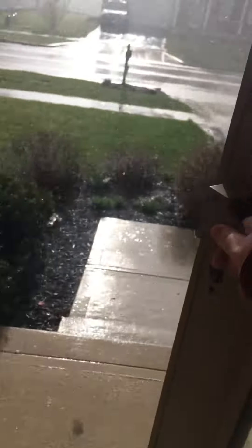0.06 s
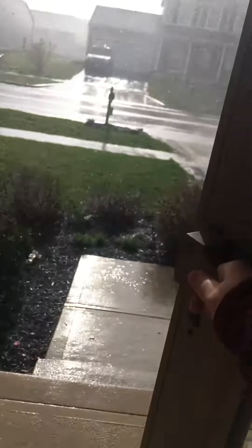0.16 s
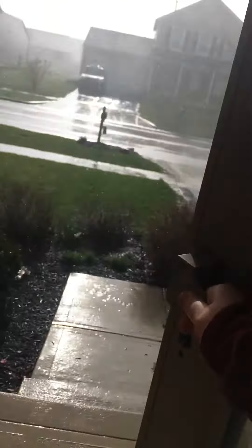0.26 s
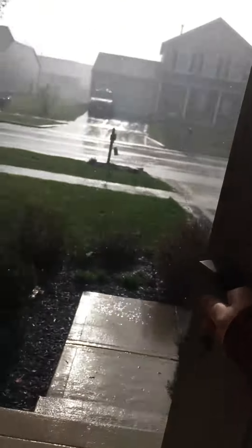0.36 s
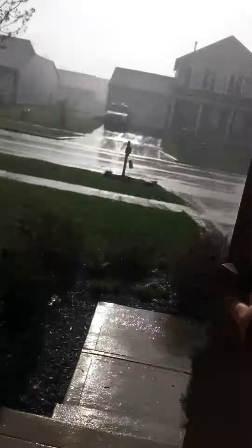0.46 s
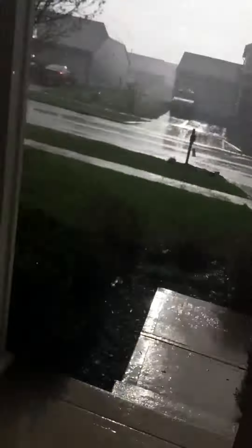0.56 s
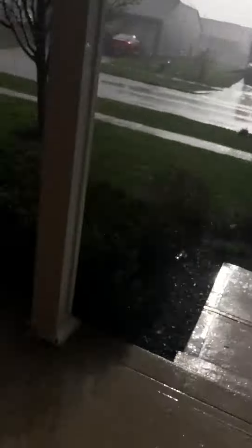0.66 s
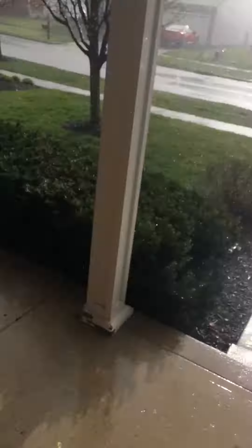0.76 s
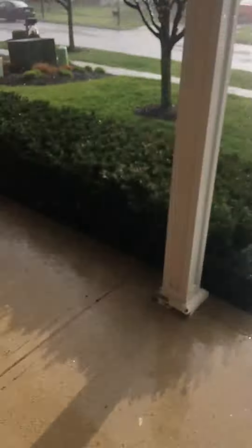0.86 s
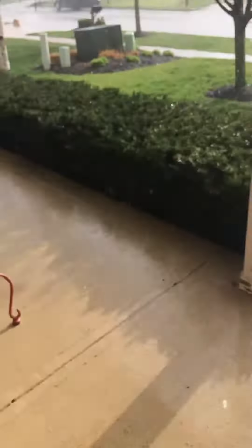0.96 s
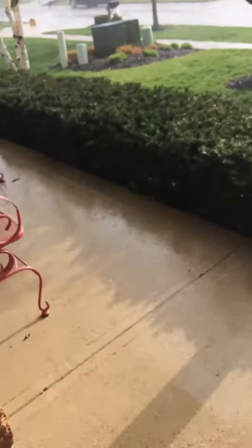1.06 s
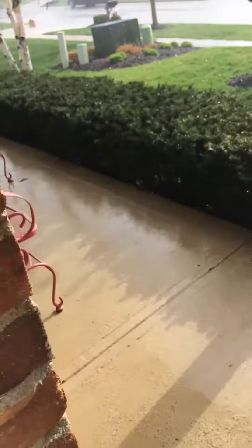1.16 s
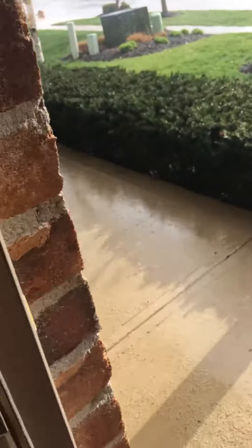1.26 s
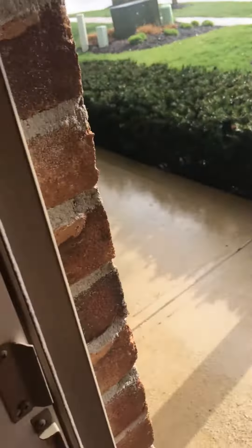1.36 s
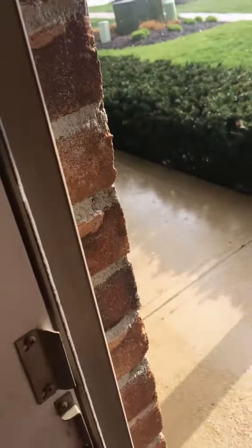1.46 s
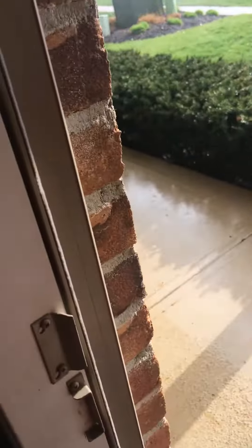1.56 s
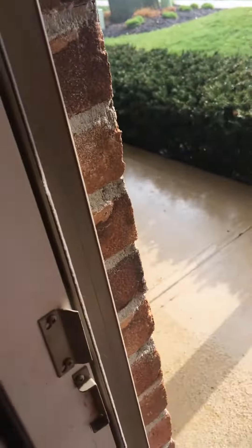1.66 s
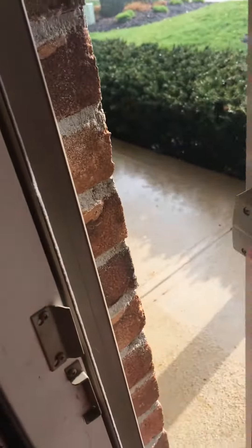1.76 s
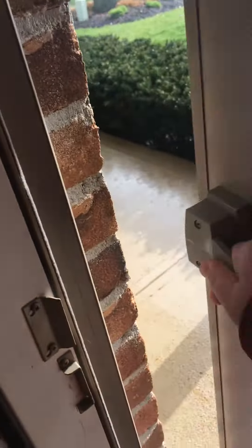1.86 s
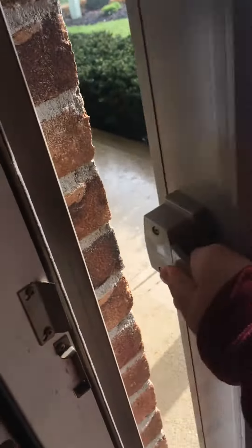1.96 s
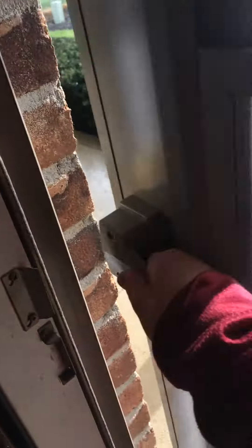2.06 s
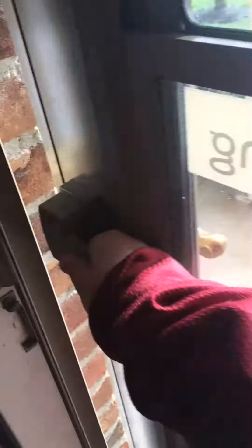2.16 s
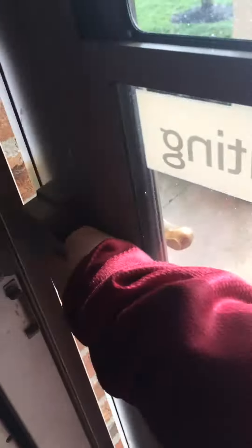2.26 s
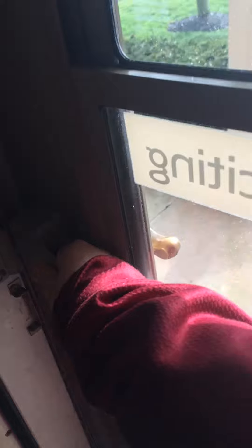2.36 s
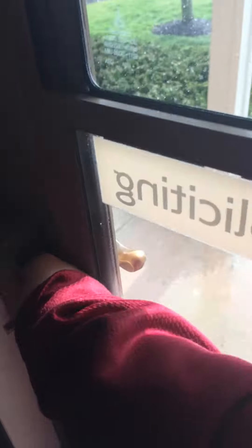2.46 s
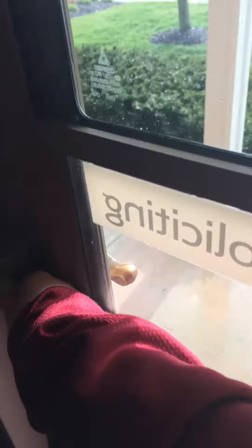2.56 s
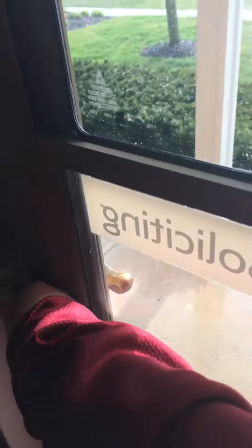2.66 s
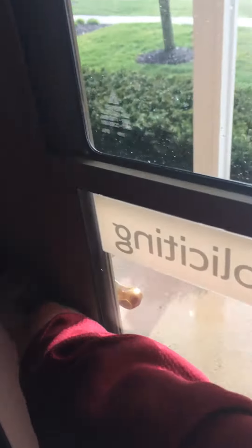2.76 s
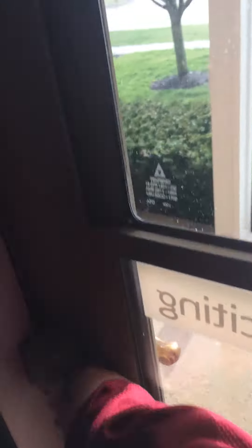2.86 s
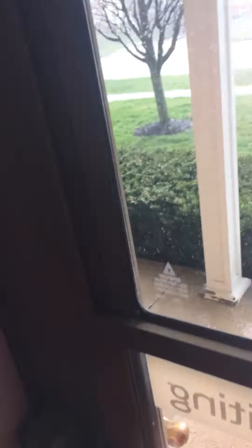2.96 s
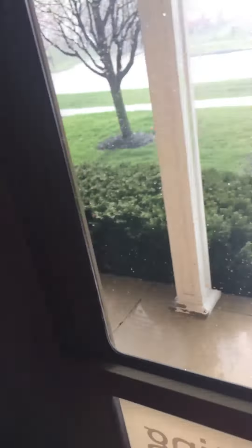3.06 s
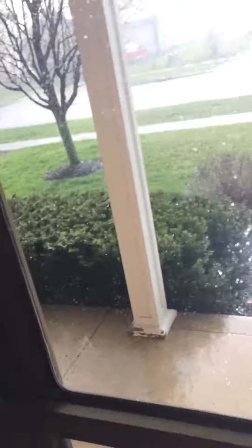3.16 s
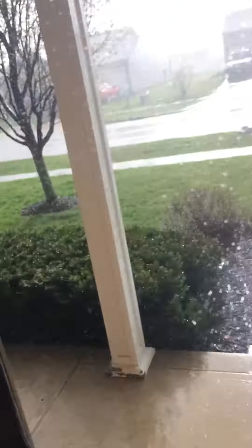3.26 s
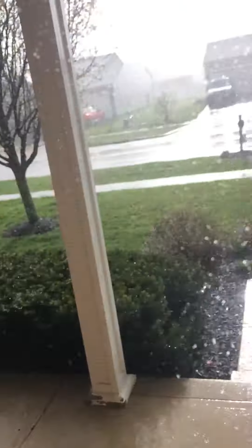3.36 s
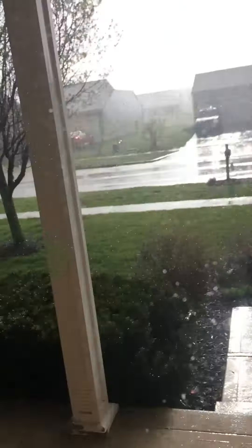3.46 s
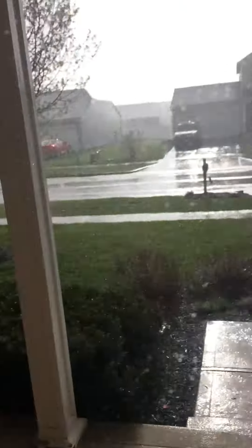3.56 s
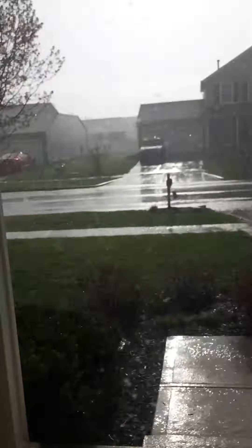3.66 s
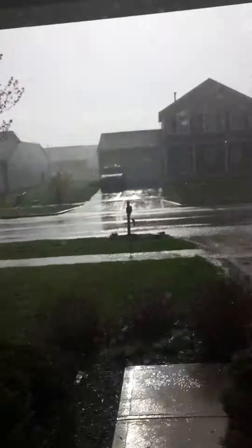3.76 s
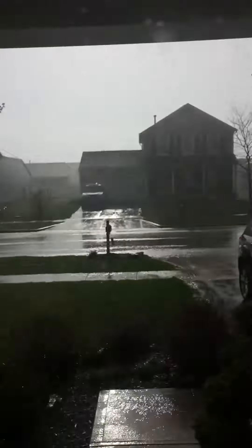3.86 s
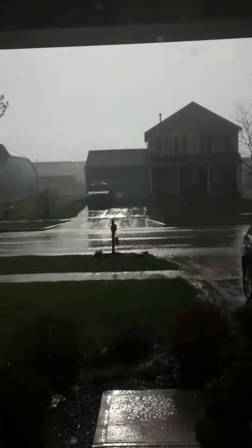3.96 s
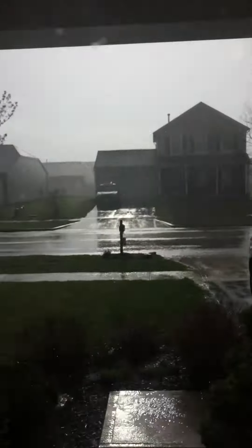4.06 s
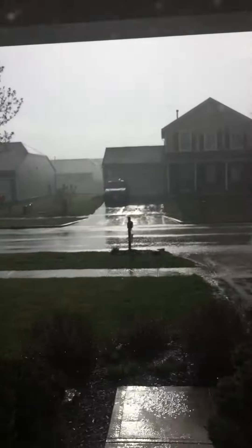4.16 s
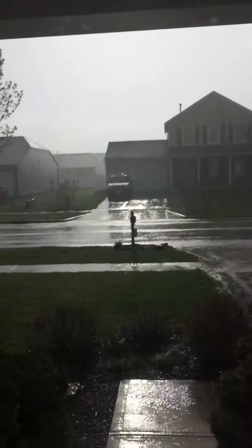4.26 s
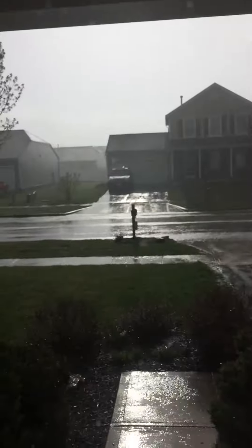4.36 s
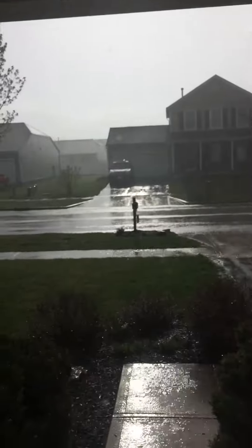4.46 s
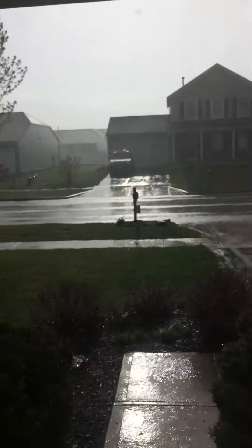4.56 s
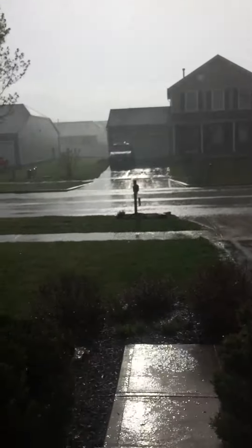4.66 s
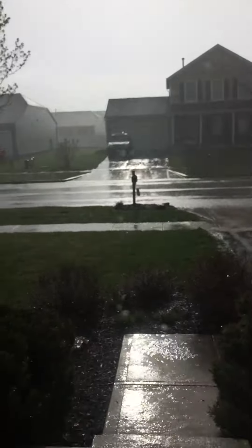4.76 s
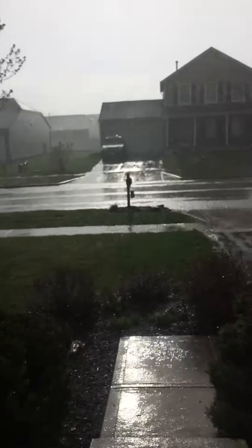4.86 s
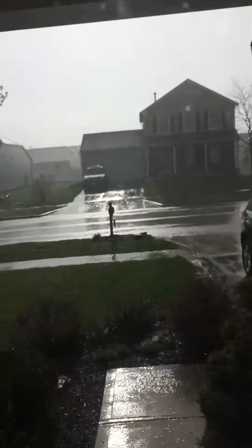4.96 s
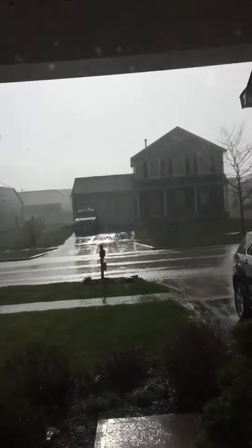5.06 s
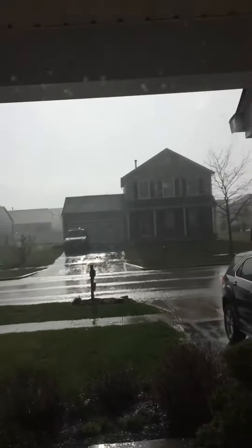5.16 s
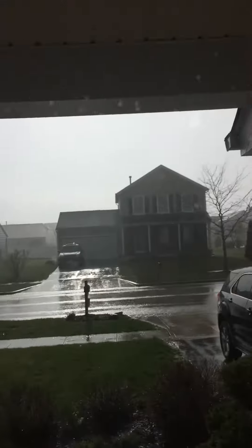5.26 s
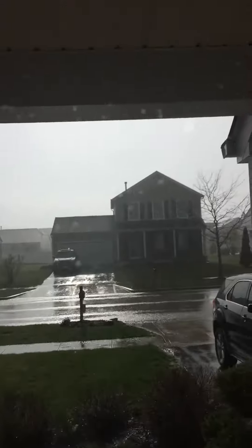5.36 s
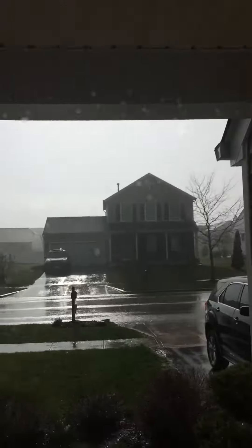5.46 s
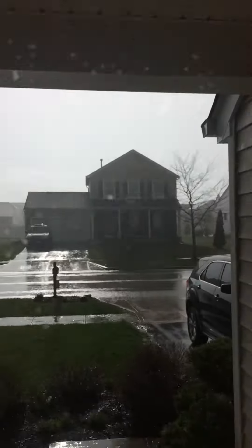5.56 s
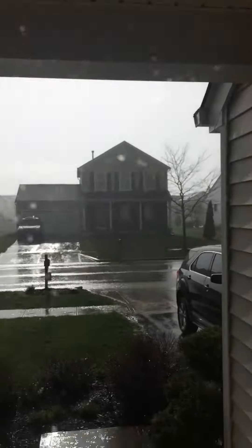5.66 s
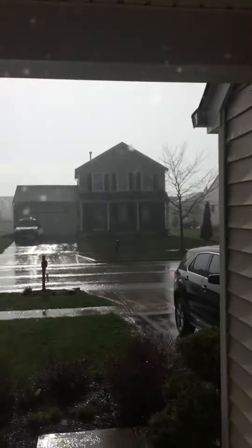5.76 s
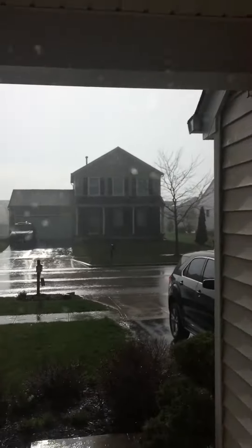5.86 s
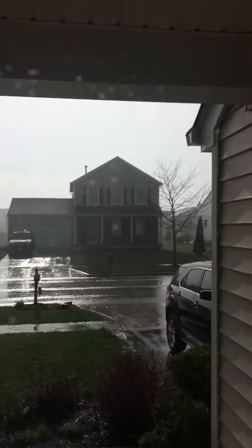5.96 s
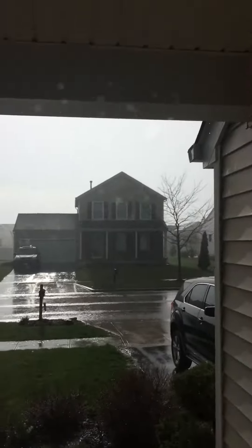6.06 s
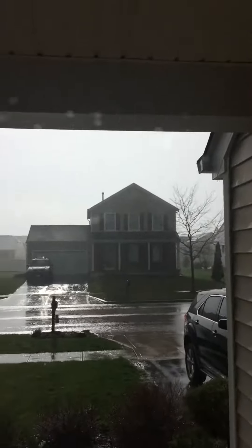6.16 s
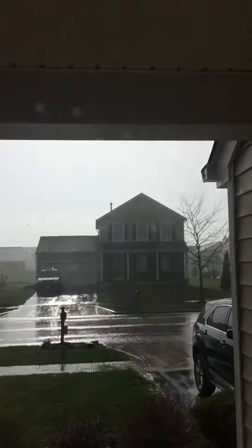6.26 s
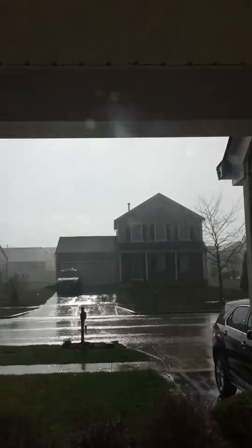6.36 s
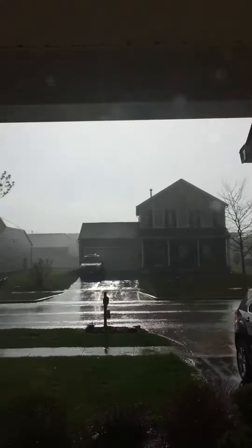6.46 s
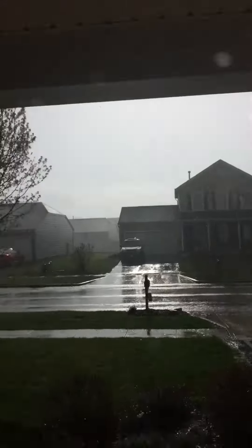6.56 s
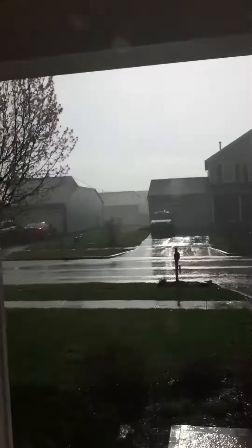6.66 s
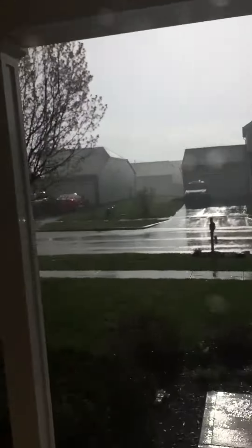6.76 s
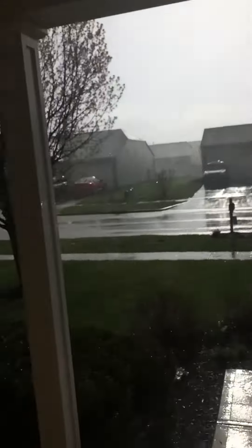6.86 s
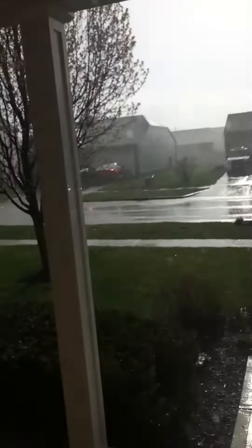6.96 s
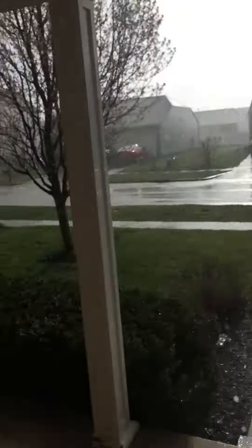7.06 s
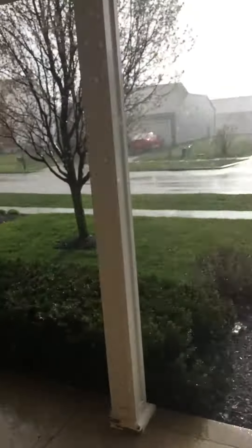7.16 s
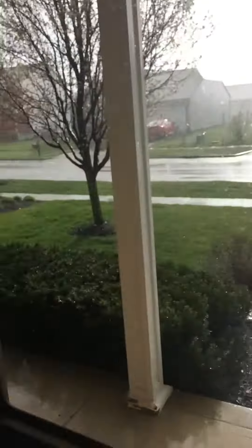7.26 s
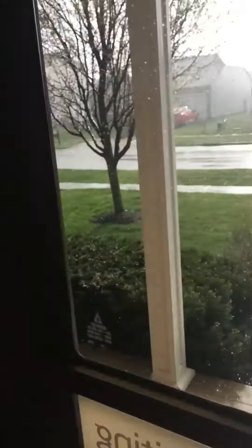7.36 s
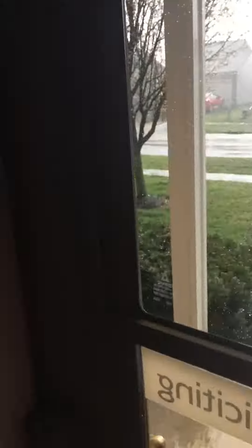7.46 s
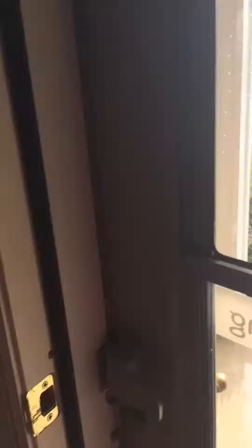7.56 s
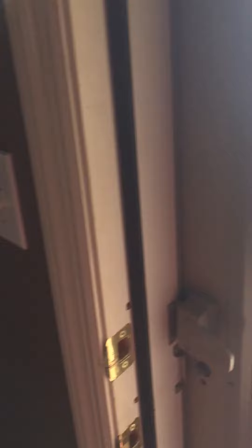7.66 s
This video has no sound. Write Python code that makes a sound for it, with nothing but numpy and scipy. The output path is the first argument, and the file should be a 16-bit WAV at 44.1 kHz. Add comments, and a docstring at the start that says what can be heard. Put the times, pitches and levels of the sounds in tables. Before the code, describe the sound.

Heavy rain hisses, then fades as a squeaking storm door is pulled shut with a rattle and loud thunk, followed by lighter knocks.

```python
"""Heavy rain hisses beyond a porch: far drops merge into a wash and near splashes fizz. A glazed storm
door is pulled shut, its closer squeaking as the rod sticks and slips, and the rain fades. The latch
rattles against the strike and the door slams home with a thunk. In the hallway the rain is a murmur
under dull thumps, a few ringing knocks on the pane and a sleeve that brushes close by."""
import sys
import numpy as np
from scipy import signal
from scipy.fft import rfft, irfft, next_fast_len
from scipy.io import wavfile
from scipy.ndimage import uniform_filter1d, map_coordinates

SR = 44100
rng = np.random.default_rng(int(sys.argv[2]) if len(sys.argv) > 2 else 0)


def transcribe(u):
    """Save the signal u as a 16-bit wav file named by the first command-line argument.

    u: samples, shape (n,) or (channels, n), limited to [-1, 1]; the rate is SR.
    q: integer samples, one column per channel.
    """
    v = np.clip(np.atleast_2d(u).T, -1, 1)
    q = np.round(v * 32767).astype(np.int16)
    wavfile.write(sys.argv[1], SR, q)


N = 340050

SEAL_START_S, SEAL_END_S = 2.24, 2.52  # the door's last gap closes
# Low end shared by the storm and the dragging sleeve. Each row: frequency in Hz, relative level in dB.
RUMBLE_SPECTRUM = [(13, -38.5), (22, -19.5), (53, 0.5), (81, 0.5), (108, 3), (210, -5), (325, -14.5),
                   (400, -12), (520, -30.5), (880, -120)]


def amp(db):
    """Decibels to gain."""
    return 10 ** (np.asarray(db) / 20)


def unit(x):
    """x at rms 1."""
    return x / np.sqrt(np.mean(x ** 2) + 1e-20)


def clock(size):
    """Seconds for each sample."""
    return np.arange(size) / SR


def along(points, hz):
    """Read (Hz, value) points at hz, on a log frequency axis."""
    freqs, values = np.transpose(points)
    return np.interp(np.log(hz + 1), np.log(freqs + 1), values)


def pitched(shape, hz):
    """Tune a spectrum given in multiples of a pitch to hz."""
    return [(multiple * hz, db) for multiple, db in shape]


def wobble(rate):
    """A smooth random curve, rate knots a second."""
    return map_coordinates(rng.standard_normal(int(N * rate / SR) + 4), [clock(N) * rate])


def colour(x, spectrum):
    """x shaped by (Hz, dB) points, falling steeply beyond their ends, at rms 1."""
    size = next_fast_len(len(x) + 4096)
    hz = np.fft.rfftfreq(size, 1 / SR)
    skirts = np.minimum(1, hz / spectrum[0][0]) ** 2 * np.minimum(1, spectrum[-1][0] / (hz + 1)) ** 2
    return unit(irfft(rfft(x, size) * amp(along(spectrum, hz)) * skirts, size)[:len(x)])


def patchy(depth_db):
    """White noise with drifting patches of random gain."""
    bins = signal.stft(rng.standard_normal(N), nperseg=512)[2]
    patches = uniform_filter1d(rng.standard_normal(bins.shape), size=5, axis=0)
    patches = uniform_filter1d(patches, size=12, axis=1)
    return signal.istft(bins * amp(depth_db * unit(patches)), nperseg=512)[1][:N]


def patter(rate, spread_db):
    """Tiny random impacts of uneven size, about rate a second, at rms 1."""
    impacts = (rng.random(N) < rate / SR) * rng.standard_normal(N)
    return unit(impacts * amp(spread_db * np.clip(rng.standard_normal(N), -2, 2)))


def dying(t, t60):
    """A decay of 60 dB in t60 seconds."""
    return np.exp(-np.log(1000) * t / t60)


def burst(spectrum, t60, attack=0.0003):
    """Dense, quickly dying vibration after a blow."""
    t = clock(SR // 2)
    envelope = dying(t, t60) * (1 - np.exp(-(t / attack) ** 2))
    noise = colour(rng.standard_normal(len(t)), spectrum)
    return unit(noise * envelope) * np.sqrt(np.mean(envelope ** 2))


def ring(modes, scatter_db):
    """Struck modes: dying sines of random polarity, their levels scattered by scatter_db."""
    t = clock(SR // 2)
    return sum(amp(db + scatter_db * rng.standard_normal()) * dying(t, t60)
               * np.sin(2 * np.pi * hz * t) * rng.choice([-1, 1]) for hz, db, t60 in modes)


def add(track, s, sound):
    """Mix a sound in at s seconds."""
    start = max(0, round(s * SR))
    track[start:start + len(sound)] += sound[:N - start]


def door_open():
    """1 while rain gets past the door, 0 once it has sealed."""
    return np.interp(clock(N), [SEAL_START_S, SEAL_END_S], [1, 0])


def rain():
    """Far drops merge into a wash; near splashes fizz, and are screened first as the door swings to."""
    # Tone of the far drops and the near splashes. Each row: frequency in Hz, relative level in dB.
    wash_spectrum = [(150, -3), (280, 0), (380, -8.5), (560, -4), (780, -10.5), (1200, -5.5), (2100, -10),
                     (3000, -14), (4000, -31.5), (9000, -31.5)]
    fizz_spectrum = [(1500, -1), (3000, 1), (4500, 0.5), (7000, -2), (10000, -4), (15000, -6.5)]
    step_back_s = 0.81  # the rain is nearest here, at the threshold
    rise_db_per_s, wash_fade_db_per_s, fizz_fade_db_per_s = 0.5, 5.5, 10
    t = clock(N)
    before, after = np.maximum(step_back_s - t, 0), np.maximum(t - step_back_s, 0)
    wash_db = -46.5 - rise_db_per_s * before - wash_fade_db_per_s * after
    fizz_db = -48 - rise_db_per_s * before - fizz_fade_db_per_s * after
    drops = colour(patchy(depth_db=1.55) + 0.32 * patter(rate=900, spread_db=8), wash_spectrum)
    # only the lower part of the wash bends round the closing door
    muffled = signal.sosfiltfilt(signal.butter(2, 2200, fs=SR, output="sos"), drops)
    shade = np.interp(t, [1.7, 2.15], [0, 1])
    wash = amp(wash_db + 0.8 * wobble(8)) * ((1 - shade) * drops + shade * muffled)
    fizz_gain = amp(fizz_db + 0.13 * wobble(5.8))
    splashes = colour(patchy(depth_db=2) + 0.5 * patter(rate=2100, spread_db=2.5), fizz_spectrum)
    return door_open() * (wash + fizz_gain * splashes)


def storm_bed():
    """The storm's rumble ducks as the door seals, and a murmur of rain comes through the glass."""
    # Tone of rain behind the shut door. Each row: frequency in Hz, relative level in dB.
    murmur_spectrum = [(250, -15), (450, -9), (700, -13), (1200, -14.5), (2000, -17.5), (2900, -17.5),
                       (4000, -25), (6500, -24), (10000, -27.5), (15500, -31.5)]
    open_db, shut_db = -44.5, -56.5  # of the rumble
    rumble_fade_db_per_s, murmur_fade_db_per_s = 2.5, 0.41
    t = clock(N)
    inside = np.interp(t, [1.8, 2.5], [0, 1])
    murmur_db = -61 - murmur_fade_db_per_s * (t - SEAL_END_S) + 0.18 * wobble(45)
    murmur = colour(patchy(depth_db=2.16) + 0.32 * patter(rate=480, spread_db=6.5), murmur_spectrum)
    rumble_db = shut_db + door_open() * (open_db - rumble_fade_db_per_s * t - shut_db)
    rumble = amp(rumble_db + 1.2 * wobble(14)) * colour(rng.standard_normal(N), RUMBLE_SPECTRUM)
    return inside * amp(murmur_db) * murmur + rumble


def door_closer():
    """The closer's rod sticks and slips in thin, slightly unsteady whistles."""
    # Each row: start and end in seconds, pitch in Hz, level in dB, fade in dB per second.
    squeaks = [(0, 0.083, 4581, -49, 20), (0.1, 0.31, 4590, -52, 22), (0.202, 0.49, 8899, -38, 67),
               (0.26, 0.382, 8610, -44, 65)]
    t, out = clock(N), np.zeros(N)
    for start, end, hz, db, fade in squeaks:
        gate = np.clip((t - start) / 0.0019, 0, 1) * np.clip((end - t) / 0.027, 0, 1)
        phase = 2 * np.pi * np.cumsum(hz * (1 + 0.00072 * wobble(257))) / SR
        out += gate * amp(db - fade * np.abs(t - start) + 1.7 * wobble(66)) * np.sin(phase)
    return out


def thumps():
    """A soft, heavy push swells, its pitch sagging as the load relaxes; the structure shudders after."""
    # Feet, hand and door leaf.
    # Each row: start in seconds, level in dB, nominal pitch in Hz, swell in seconds.
    pushes = [(0.019, -30, 109.6, 0.013), (.425, -25.5, 85, 0.0052), (0.636, -28.5, 55, 0.0084),
              (.794, -23, 147, 0.011), (0.916, -27.5, 98, 0.0041), (2.076, -21, 135, 0.0074),
              (2.09, -25, 98, 0.0085), (2.583, -24.5, 138, 0.0045), (2.651, -26, 85, 0.01),
              (2.691, -31.5, 115, 0.014), (2.854, -22, 132.2, 0.015), (2.885, -17.5, 168, 0.013),
              (2.921, -10, 73, 0.0041), (2.973, -20, 138, 0.0075), (3.041, -33.5, 123.5, 0.018),
              (3.508, -27, 137.5, 0.011), (4.812, -28.5, 145, 0.007), (6.138, -19, 138, 0.013)]
    shudder_shape = [(0.55, 1.5), (0.8, -2), (1.6, -8.5), (2.2, -23), (4, -29)]
    t, out = clock(SR // 2), np.zeros(N)
    for start, db, hz, swell in pushes:
        age = t / swell
        phase = 2 * np.pi * np.cumsum(hz * (0.824 + 0.392 * np.exp(-age / 2))) / SR
        thud = age * np.exp(1 - age) * np.sin(phase)
        shudder = amp(-9.5) * burst(pitched(shudder_shape, hz), t60=0.2, attack=0.008)
        add(out, start, amp(db) * (thud + shudder))
    return out


def scuffs():
    """Fingers and cloth graze in short, gritty scuffs, with a faint rustle as the hand leaves the door."""
    # Each row: peak time in seconds, level in dB, half-width in seconds.
    grazes = [(0.217, -46, 0.0042), (0.678, -40, 0.0087), (0.719, -49, 0.035), (0.857, -45.5, 0.012),
              (1.249, -47.5, 0.02), (3.697, -55, 0.011), (3.736, -62, 0.017), (3.849, -64, 0.015),
              (4.105, -65.5, .013), (5.249, -61.5, 0.036), (5.35, -65, 0.0222), (6.583, -59, 0.01993),
              (7.33, -55, 0.017)]
    busiest_s, calming_db_per_s, swing_db = 3.6, 7.5, 5  # of the rustle
    t = clock(N)
    touch = sum(amp(db) * np.exp(-((t - peak) / width) ** 2) for peak, db, width in grazes)
    flutter_db = swing_db * np.clip(wobble(14), -2, 2)
    rustle = amp(-69.5 - calming_db_per_s * np.abs(t - busiest_s) + flutter_db)
    grit = rng.standard_normal(N) + 0.26 * patter(rate=977, spread_db=15.5)
    return (touch + rustle) * colour(grit, [(1500, -1.5), (3000, 1), (7000, 5.5), (15000, 0)])


def knocks():
    """A blunt tap sets the pane ringing and its frame booming; the slam shakes the whole leaf."""
    # Hits on the glazed panel. Each row: start in seconds, level in dB, pitch in Hz, boom trim in dB.
    hits = [(0.429, -33, 387, -1.5), (0.711, -35, 700, -3), (0.757, -37.5, 1100, 2),
            (0.799, -27, 760, -9.5), (1.298, -40, 1620, -0.5), (2.908, -23, 1056, 1.5),
            (3.944, -33.5, 1010, -27), (4.667, -51.5, 1605, 2), (5.622, -30, 1020, -10),
            (5.925, -50, 1700, -4), (6.128, -31, 1070, 5), (6.1369, -15, 1097, -9.5)]
    # Tone of the tap. Each row: multiple of the hit's pitch, relative level in dB.
    tap_shape = [(.15, -14.5), (.38, 0.5), (.55, -6), (.78, -3), (1, 4.5), (1.2, -5.5), (1.5, -16),
                 (2.1, -23.5), (3.6, -54)]
    # Modes of the glass and of the door leaf. Each row: frequency in Hz, level in dB, t60 in seconds.
    pane_modes = [(208, 2, 0.22), (307, -19, .2), (355, -16, 0.25), (448, -2, 0.09), (710, -5, 0.225),
                  (836, -14.5, 0.316), (894, -14.5, 0.289), (963, -18.5, 0.5), (1056, -16.5, .25),
                  (1179, -35, 0.25), (1459, -17, 0.13), (1820, -25.5, 0.33)]
    leaf_modes = [(55.9, -40, 0.416), (209, -32, 0.24), (355, -38, .85), (1030, -18, 0.063)]
    boom_spectrum = [(110, -10), (190, 6), (320, -13)]
    tick_spectrum = [(1500, 3.5), (3000, 9), (6500, -6), (14000, -11.5)]
    firm_knock_db, slam_s = -14.5, 2.909
    out = np.zeros(N)
    for start, db, hz, boom_db in hits:
        force_db = db - firm_knock_db  # the ring grows steeply with force, the tick hardly at all
        tap = burst(pitched(tap_shape, hz), t60=0.052, attack=0.00065)
        pane = amp(-28.5 + 1.4 * force_db) * ring(pane_modes, scatter_db=0)
        boom = amp(boom_db + 4) * burst(boom_spectrum, t60=0.088, attack=0.0035)
        tick = amp(-42.5 + 0.27 * force_db) * burst(tick_spectrum, t60=0.057)
        add(out, start, amp(db) * (tap + boom) + pane + tick)
    add(out, slam_s, ring(leaf_modes, scatter_db=1))
    return out


def latch():
    """Each metal contact clicks, rings the latch modes near its pitch and shakes the hollow frame."""
    # Latch against strike and frame.
    # Each row: start in seconds, level in dB, click pitch in Hz, relative level of the edge in dB.
    contacts = [(2.546, -24.5, 5260, -40), (2.577, -27, 3325, -19.5), (2.6369, -34.5, 3990, -17),
                (2.6411, -24.5, 3440, -21), (2.7138, -36, 5450, -10.5), (2.7193, -34, 3500, -25),
                (2.796, -40, 4670, -12), (2.865, -33.5, 3430, -14), (2.8786, -6.5, 5200, -18.5),
                (2.885, -19, 4600, -22), (2.895, -26, 4760, -9.5), (2.907, -26.5, 4650, -0.5),
                (2.9403, -27.5, 3550, -6), (2.9593, -34, 5000, -11), (2.9748, -19.5, 3850, -6),
                (3.054, -45.5, 4400, -22), (3.074, -47, 4470, -17)]
    # Ring of the latch. Each row: frequency in Hz, relative level in dB, t60 in seconds.
    steel_modes = [(1598, -5, .08), (1912, -4, .09), (2492, -7, .08), (3300, -6, .045), (4353, 0, .055),
                   (4673, -1, .05), (4904, -3, .05), (5350, -9, .04), (6796, -7, .05), (8743, -3, .05)]
    # Tone of the click. Each row: multiple of its pitch, relative level in dB.
    click_shape = [(.3, -5.5), (.6, -8.5), (.85, -7), (1, -2.5), (1.3, -11), (1.9, -12.5), (2.4, -32)]
    # Tone of the frame and of the click's bright edge. Each row: frequency in Hz, relative level in dB.
    frame_spectrum = [(120, 7), (300, 3), (580, 0), (850, -3), (1600, -0.5), (2400, -15), (3600, -22)]
    edge_spectrum = [(7000, -25), (10000, -1.5), (15000, -0.5)]
    frame_max_db = -20  # the frame shakes only to the limit of its play
    out = np.zeros(N)
    for start, db, hz, edge_db in contacts + latch_settling(count=3):
        force = pitched(click_shape, hz)
        driven_modes = [(freq, level + along(force, freq), t60) for freq, level, t60 in steel_modes]
        steel = amp(-12.5) * ring(driven_modes, scatter_db=3.5)
        click = amp(-3) * burst(force, t60=0.024, attack=0.0004)
        frame = amp(min(db + 1.5, frame_max_db)) * burst(frame_spectrum, t60=0.052, attack=0.0011)
        edge = amp(edge_db) * burst(edge_spectrum, t60=0.024)
        add(out, start, amp(db) * (click + steel + edge) + frame)
    return out


def latch_settling(count):
    """Rows of ever weaker latch contacts at uneven gaps after the slam."""
    first_s, gap_s, first_db, loss_db = 3.1274, 0.069, -40.5, 11.5
    pitch_hz, edge_db = 4400, -21
    return [(first_s + gap_s * k * rng.uniform(0.92, 1.08), first_db - loss_db * k, pitch_hz, edge_db)
            for k in range(count)]


def stroke(start, end, lag, arch_db):
    """Envelope of cloth taking hold, speeding up and letting go; it peaks lag seconds after midway."""
    t, edge_s = clock(N), 0.044
    contact = np.clip(np.minimum(t - start, end - t) / edge_s, 0, 1)
    from_peak = (2 * (t - lag) - start - end) / (end - start)
    return contact * amp(-arch_db * from_peak ** 2)


def sleeve():
    """Cloth swishes in long strokes, its fibres catching and letting go, over a low drag."""
    # Each row: start and end in seconds, weave level in dB, folds level in dB, lag of the folds in
    # seconds, scrape level in dB, mid-stroke growth of the reflection's delay in ms per second.
    strokes = [(3.245, 3.95, -71, -69.5, -0.015, -88, 0.02), (4.37, 5.097, -67, -63.5, -0.05, -64.5, 0.05),
               (5.543, 6.1, -76, -64.5, 0.0075, -73, 0.036), (6.577, 7.415, -58, -58.5, 0.087, -83, 0.79)]
    # Hiss of the weave and duller rub of the folds. Each row: frequency in Hz, relative level in dB.
    weave_spectrum = [(3000, -18), (4500, -3), (6000, 4), (8000, -2), (10000, -11), (14000, -13)]
    folds_spectrum = [(900, -0.5), (1500, -3), (2500, -5.5), (4000, -9.5)]
    # Thin resonances of slow rubbing. Each row: frequency in Hz, width in Hz, relative level in dB.
    scrape_bands = [(1990, 230, 4), (2990, 70, -1), (6230, 380, -6)]
    reflection_gain, mid_delay_ms = 0.42, 0.3
    t, out = clock(N), np.zeros(N)
    weave = colour(patchy(depth_db=3), weave_spectrum)
    folds = colour(patchy(depth_db=3), folds_spectrum)
    scrape = unit(sum(amp(db) * wobble(2 * width) * np.sin(2 * np.pi * hz * t + wobble(width))
                      for hz, width, db in scrape_bands))
    drag = amp(3) * colour(rng.standard_normal(N), RUMBLE_SPECTRUM)
    catching = amp(0.45 * wobble(12))
    for start, end, weave_db, folds_db, lag, scrape_db, growth in strokes:
        sliding = stroke(start, end, lag=0, arch_db=10.5)
        pressing = stroke(start, end, lag, arch_db=11)
        swish = catching * (amp(weave_db) * sliding * weave + amp(folds_db) * pressing * folds)
        # the reflection off the arm takes longer as the arm moves, so the colour sweeps downward
        sweep = np.clip(growth * (t - (start + end) / 2) / mid_delay_ms, -1, 1)
        delay_ms = mid_delay_ms * np.exp(sweep) + 0.038 * wobble(18)
        out += swish + reflection_gain * map_coordinates(swish, [(t - delay_ms / 1000) * SR])
        out += pressing * (amp(folds_db) * drag + amp(scrape_db) * scrape)
    return out


def hallway(x):
    """The hallway's echo: the walls colour it and each frequency dies at its own speed."""
    # Length of the tail. Each row: frequency in Hz, t60 in seconds.
    decay_times = [(60, 0.36), (300, 0.48), (1000, 0.36), (4000, 0.3), (8000, 0.23), (15000, 0.067)]
    wall_spectrum = [(30, 1.5), (200, 1.5), (1500, -5), (6000, -4.5), (16000, 3)]
    hz, t, bins = signal.stft(colour(rng.standard_normal(SR), wall_spectrum), SR, nperseg=256)
    tail = signal.istft(bins * dying(t, along(decay_times, hz)[:, None]), SR, nperseg=256)[1]
    tail *= np.clip(clock(len(tail)) / 0.0084, 0, 1)
    return signal.fftconvolve(x, tail / np.linalg.norm(tail))[:N]


def scene():
    """Door hits with their echo, over the rain, cloth and squeaks, in mono."""
    metal, thuds, panel = latch(), thumps(), knocks()
    echo = amp(-11.5) * hallway(metal) + amp(-15) * hallway(thuds) + amp(-16.5) * hallway(panel)
    hits = metal + thuds + panel + echo
    return (hits + rain() + storm_bed() + sleeve() + scuffs() + door_closer())[None]


def record(dry):
    """A brick-wall low-pass takes off the very top of the mix."""
    top_hz = 15500
    size = next_fast_len(N + SR // 2)
    passband = np.fft.rfftfreq(size, 1 / SR) < top_hz
    return irfft(rfft(dry, size) * passband, size)[..., :N]


dry = scene()
out = record(dry)
transcribe(out)
```